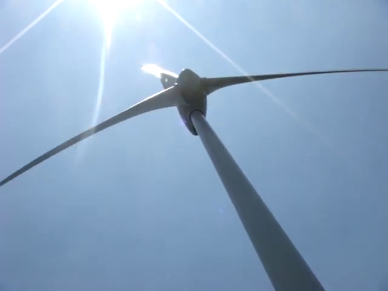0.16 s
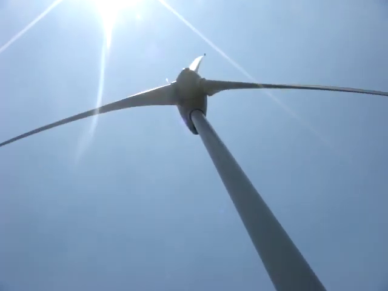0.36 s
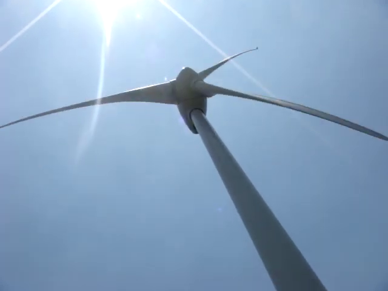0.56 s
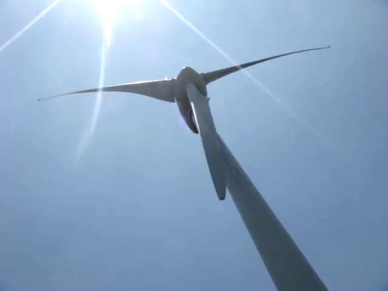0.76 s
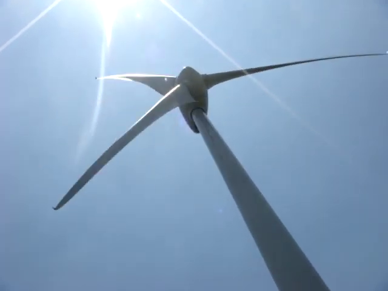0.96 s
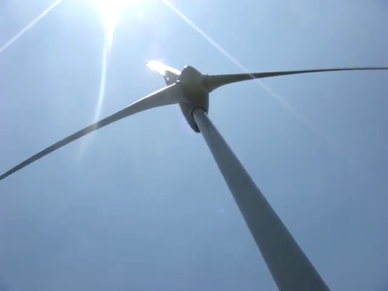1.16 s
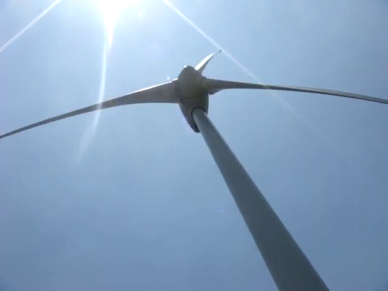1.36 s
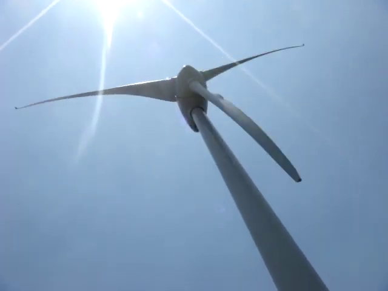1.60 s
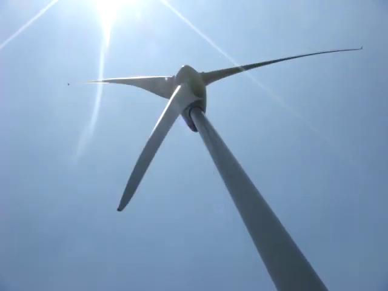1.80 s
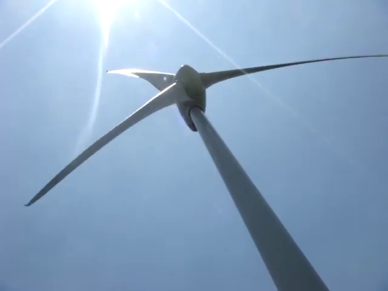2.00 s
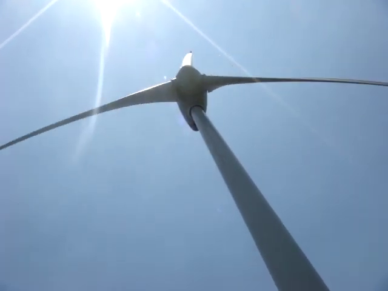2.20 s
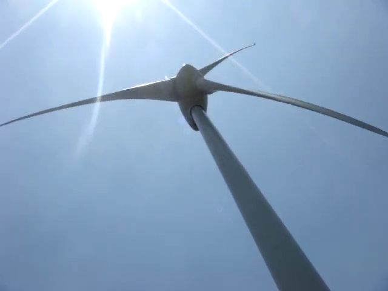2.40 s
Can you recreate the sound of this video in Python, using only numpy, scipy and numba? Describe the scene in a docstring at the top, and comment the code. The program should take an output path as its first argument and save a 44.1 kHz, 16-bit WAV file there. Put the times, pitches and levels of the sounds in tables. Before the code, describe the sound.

Dull wind turbulence flutters and pops right on a cheap microphone under a wind turbine, distant blades hissing softly about once a second; a bright, distorted gust bursts in late, leaving a subdued, quiet end.

```python
"""A hard gust of wind hits a small microphone under a wind turbine; lighter eddies buffet it before and after.
Gust and breeze are noise whose colour slides with air speed; single strong eddies thump as pressure pulses.
Overhead the blades swish about once a second, a smooth hiss with a slow swell.
The gust pushes the recorder's gain control down, and its slow recovery leaves the scene quiet."""
import sys
import numpy as np
from scipy import signal
from scipy.fft import rfft, irfft, next_fast_len
from scipy.io import wavfile
from scipy.ndimage import uniform_filter1d
from numba import njit

SR = 44100
rng = np.random.default_rng(int(sys.argv[2]) if len(sys.argv) > 2 else 0)


def ratio_of_db(decibels):
    """Turn decibels (scalar or array-like) into linear amplitude factors; 0 dB maps to 1."""
    return 10 ** (np.asarray(decibels, float) / 20)


def wav_record(signal):
    """Record a signal, one row per channel, as 16-bit PCM in the file named by sys.argv[1]."""
    frames = np.transpose(np.atleast_2d(signal))
    bounded = np.clip(frames, -1, 1)
    # unit amplitude maps onto the largest positive 16-bit level
    quanta = np.round(bounded * 32767).astype(np.int16)
    wavfile.write(sys.argv[1], SR, quanta)


N = 108045  # samples, 2.45 s


def level(x, db):
    """Scale to an rms level in dB."""
    return x * ratio_of_db(db) / np.sqrt(np.mean(x ** 2))


def curve(table, axis):
    """Draw one column of a table as a line in time."""
    rows = np.array(table)
    return np.interp(np.arange(N) / SR, rows[:, 0], rows[:, axis])


def walk(rate):
    """Random flutter, mostly below rate [Hz] with its slowest drift removed; rms 1."""
    hop = 16  # samples between flutter points
    size = next_fast_len(N // hop + 2)
    u = np.fft.rfftfreq(size, hop / SR) / rate
    shape = (4 * u) / (1 + 4 * u) / (1 + u ** 2)
    flutter = irfft(rfft(rng.standard_normal(size)) * shape, size)
    return np.interp(np.arange(N) / hop, np.arange(size), flutter / flutter.std())


def air(colour, speed, flutter, shared_db, own_db, rate):
    """Turbulence in third-octave bands: faster air shifts the colour up, bands puff together and flicker alone."""
    steady_below_hz = 1230  # large eddies keep their pace, small ones follow every flutter of speed
    f = np.fft.rfftfreq(N, 1 / SR)
    colour_hz, colour_db = np.transpose(colour)
    noise = rfft(rng.standard_normal(N))
    puffs_db = shared_db * walk(rate)
    waver = flutter * walk(1.72 * rate)
    out, power = 0, 0
    for hz in 20 * 2 ** (np.arange(28) / 3):
        away = np.clip(3 * np.log2(f / hz + 1e-9), -1, 1)  # distance from the band centre, in thirds of an octave
        band = irfft(noise * np.cos(away * np.pi / 2) ** 2, N)
        scaled = np.log(hz / np.clip(speed, .1, 5))
        wavering = scaled - waver * hz / (hz + steady_below_hz)
        gain = ratio_of_db(np.interp(wavering, np.log(colour_hz), colour_db))
        out = out + gain * ratio_of_db(own_db * walk(rate / 2)) * band
        power = power + ratio_of_db(2 * np.interp(scaled, np.log(colour_hz), colour_db)) * hz
    # dividing by the expected power leaves speed to change the colour and not the loudness
    return level(out * ratio_of_db(puffs_db) / np.sqrt(power), 0)


def blades():
    """Trailing-edge hiss of the blades, smooth and distant, swelling as each one sweeps down."""
    # colour of the blade wash: (frequency [Hz], density [dB per Hz])
    wash_colour = [(20, -5.5), (200, -3.5), (700, 2.5), (1500, -13.5), (2200, -15.5), (3400, -18.5),
                   (6000, -20.5), (8500, -23.5), (10000, -27.5)]
    mean_db, swish_db = -32.5, 2.5  # the swish swings this far either side of the mean
    pass_hz, near_s = 0.9, 0.65  # blade rate, and the time of one swell's peak
    t = np.arange(N) / SR
    swish = swish_db * np.cos(2 * np.pi * pass_hz * (t - near_s))
    hiss = air(wash_colour, np.ones(N), flutter=0.016, shared_db=0.32, own_db=.8, rate=17.0)
    return ratio_of_db(mean_db + swish) * hiss


def wind():
    """The breeze tumbling over the capsule: low, dull turbulence in short puffs."""
    # puffs of the breeze: (time [s], level [dB], air speed [relative to the breeze])
    breeze_puffs = [(0.0, -24, 1.1), (0.104, -30.5, 0.93), (0.184, -15.5, 1.26), (0.22, -20, 1.33),
                    (0.288, -23, 1.45), (0.356, -15.5, 1.44), (0.388, -22, 0.97), (0.452, -24.5, 1.23),
                    (0.5, -13, 0.89), (0.542, -20.5, 1.07), (0.588, -18, 0.8), (0.63, -27, 2.2),
                    (0.658, -19.5, 0.65), (0.694, -24.5, 1.15), (0.778, -11, 1.15), (0.804, -21.5, 1.15),
                    (0.846, -11.5, 1.2), (0.894, -23, 1.27), (0.968, -17, 1.15), (1.004, -23.5, 0.98),
                    (1.084, -17, 0.87), (1.188, -20, 1.04), (1.216, -23, 1.15), (1.236, -22.5, 0.94),
                    (1.284, -20, 0.93), (1.33, -14, 0.85), (1.378, -26.5, 1.75), (1.4, -18.5, 1.02),
                    (1.484, -28.5, 1.18), (1.546, -20.5, 1.15), (1.574, -24, 1.37), (1.604, -14, 1.25),
                    (1.7, -24.5, 1.25), (1.742, -14.5, 0.92), (1.784, -24.5, 1.08), (1.836, -11.5, 1.08),
                    (1.868, -21, 0.98), (1.89, -10.5, 1.32), (1.93, -10.5, 1.8), (2.2, -16, 1.3),
                    (2.25, -33, 1.4), (2.27, -28, 1.3), (2.285, -41, 1.1), (2.315, -38, 1.2),
                    (2.33, -18, 1.4), (2.355, -27.5, 1), (2.378, -19, 1.5), (2.395, -31, 1.4),
                    (2.45, -27, 1.2)]
    # colour of its eddies at relative speed 1: (frequency [Hz], density [dB per Hz])
    breeze_colour = [(15, -9), (30, -13.5), (95, 1), (300, -0.5), (430, -7), (700, -18), (1100, -27),
                     (1800, -39), (3000, -56), (8000, -85)]
    speed = curve(breeze_puffs, axis=2)
    tumble = air(breeze_colour, speed, flutter=0.19, shared_db=2.3, own_db=1.34, rate=45.)
    return ratio_of_db(curve(breeze_puffs, axis=1)) * tumble


def thumps():
    """Each strong eddy gives the diaphragm one smooth, rounded push, with a dip on either side."""
    # single eddies: (time [s], peak level [dB], width as a frequency [Hz], sign of the push [+1 or -1])
    strong_eddies = [(0.0254, -10.5, 764, 1), (0.184, -9, 600, 1), (.319, -3, 600, -1),
                     (0.3275, -5, 525, 1), (0.3475, -7, 490, 1), (.352, -5, 700, 1), (0.3548, 1, 1070, -1),
                     (0.6563, -3.5, 950, 1), (0.502, -21, 350, 1), (.776, -11, 298, -1), (.81, -8, 600, 1),
                     (0.848, -8, 600, -1), (0.989, -12.5, 890, 1), (0.953, -2.5, 394, -1),
                     (1.24, -8.5, 350, 1), (1.326, -2, 354, 1), (1.836, -5, 400, -1),
                     (1.8914, -5.5, 700, 1), (2.1795, -3, 503, -1)]
    t, out = np.arange(N) / SR, 0
    for at, db, hz, sign in strong_eddies:
        u = np.abs(np.pi * hz * np.clip(t - at, -.05, .05)) ** 1.9
        pulse = (1 - 1.05 * u) * np.exp(-u)
        out = out + np.sign(sign) * ratio_of_db(db) * pulse
    return out


def gust():
    """A fast jet of air, brighter the faster it blows; its flutter tears the hiss into shreds."""
    # course of the gust: (time [s], level [dB] ahead of the port, air speed [relative to its peak])
    gust_course = [(1.87, -35, 0.36), (1.89, -25.5, .33), (1.903, -31.5, 0.56), (1.91, -4.5, 0.13),
                   (1.928, -6, 0.4), (1.932, 1, 0.33), (1.945, -5, 0.71), (1.97, 2, 0.63), (1.99, 3, .9),
                   (2.02, 4.5, 1.09), (2.05, 5.5, 1.04), (2.065, 2.5, 0.91), (2.09, 1, 0.87),
                   (2.11, 3, 1.09), (2.125, 3.5, 0.81), (2.135, -2, 0.71), (2.155, -3.5, 0.87),
                   (2.175, 3, 0.62), (2.19, -6.5, 0.5), (2.21, -8, 0.65), (2.232, -15, 0.26),
                   (2.242, -51, 0.28)]
    # colour of its eddies at relative speed 1: (frequency [Hz], density [dB per Hz])
    jet_colour = [(15, -34.5), (60, -18.5), (220, -8.5), (400, 0.5), (740, -1), (1100, -7), (2000, -11),
                  (3300, -16), (4600, -20.5), (6500, -32.5), (10000, -51), (30000, -79)]
    port_hz, port_width_hz, port_db = 700, 190, -3.5  # the microphone's opening sings when blown hard
    t = np.arange(N) / SR
    blowing = (t > gust_course[0][0]) & (t < gust_course[-1][0])
    speed = curve(gust_course, axis=2)
    hiss = air(jet_colour, speed, flutter=0.2, shared_db=1.45, own_db=1.37, rate=99.0)
    jet = blowing * ratio_of_db(curve(gust_course, axis=1)) * hiss
    port = signal.lfilter(*signal.iirpeak(port_hz, port_hz / port_width_hz, fs=SR), jet)
    return jet + ratio_of_db(port_db) * port


def scene():
    """All sources summed at one microphone."""
    return (blades() + wind() + thumps() + gust())[None, :]


@njit
def ride(loud_db, top_db, start_db, attack, rise_db):
    """Gain in dB: falls fast while the sound is over the top, creeps back towards 0 otherwise."""
    g, out = start_db, np.empty(len(loud_db))
    for i in range(len(loud_db)):
        over = loud_db[i] + g - top_db
        g = g - attack * over if over > 0 else min(g + rise_db, 0.)
        out[i] = g
    return out


def roll_off(x):
    """The treble ends steeply here."""
    return signal.sosfilt(signal.butter(12, 10070, fs=SR, output="sos"), x)


def record(dry):
    """The recorder: gain control, circuit hiss, a low cut, rounded peaks and a steep treble cut."""
    top_db, start_db = -7.5, -3.5  # loudness the control holds down to, and its gain at the start
    attack_s, rise_db_s, sense_s = 0.0074, 3, 0.013  # time constant [s], recovery [dB/s], loudness window [s]
    hiss_db, low_cut_hz, top_hz = -59, 45, 10050
    loud_db = 10 * np.log10(uniform_filter1d(dry[0] ** 2, int(sense_s * SR)) + 1e-12)
    gain_db = ride(loud_db, top_db, start_db, 1 / (attack_s * SR), rise_db_s / SR)
    x = dry * ratio_of_db(gain_db) + ratio_of_db(hiss_db) * rng.standard_normal(N)
    x = signal.lfilter(*signal.butter(1, low_cut_hz, "high", fs=SR), x)
    x = x / (1 + np.abs(x) ** 4) ** .25  # peaks round off towards full scale
    x = signal.sosfilt(signal.ellip(10, .2, 80, top_hz, fs=SR, output="sos"), x)
    return roll_off(x)


dry = scene()
out = record(dry)
wav_record(out)
```